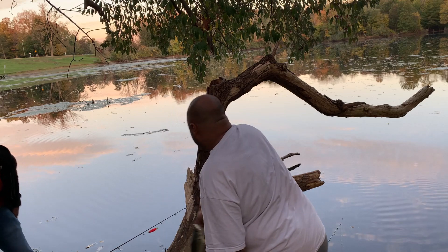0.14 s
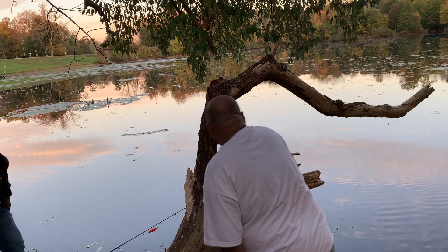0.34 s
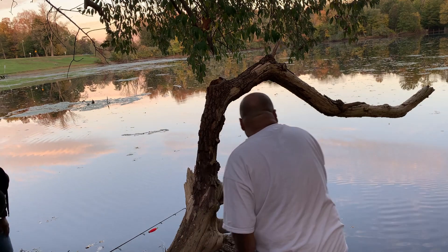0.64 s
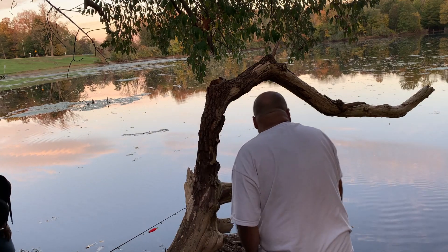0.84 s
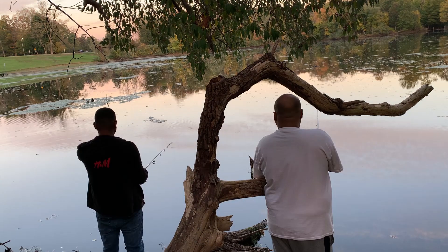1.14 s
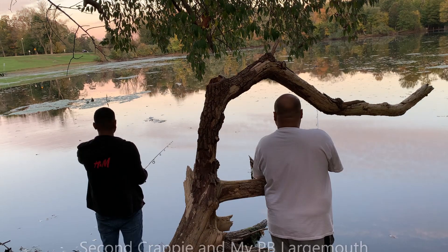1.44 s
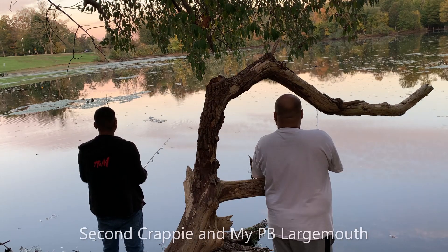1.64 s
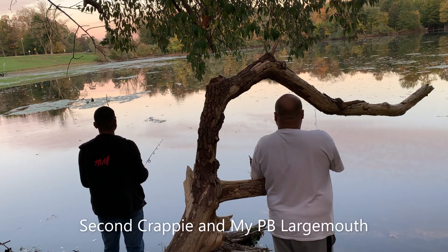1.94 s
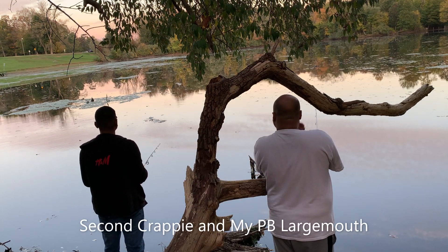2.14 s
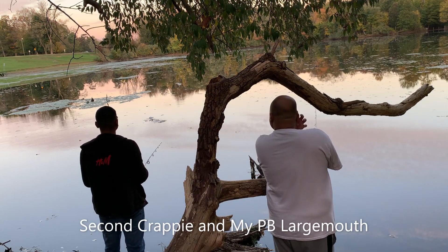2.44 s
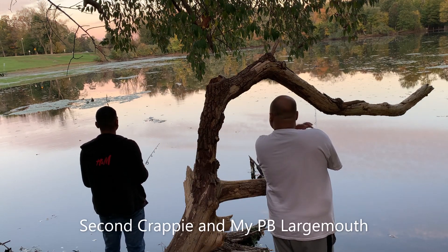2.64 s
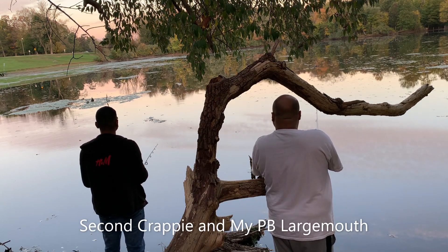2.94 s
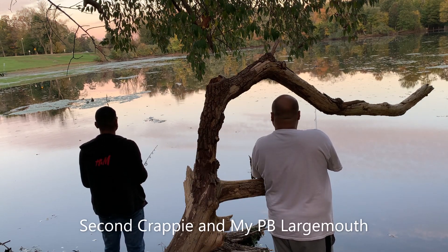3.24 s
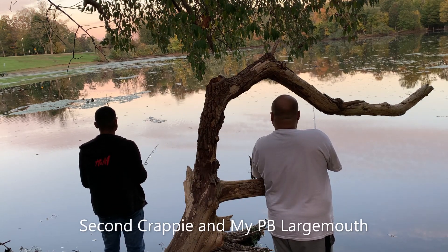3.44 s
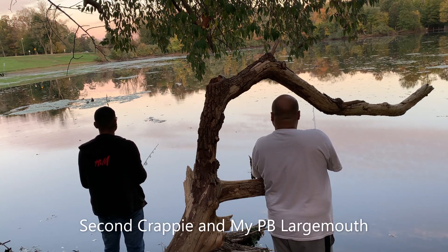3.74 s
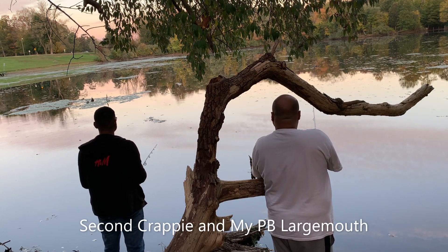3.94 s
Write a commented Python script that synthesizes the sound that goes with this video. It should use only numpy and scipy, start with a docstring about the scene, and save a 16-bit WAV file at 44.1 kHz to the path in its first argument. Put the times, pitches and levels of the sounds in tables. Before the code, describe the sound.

Crickets trill in overlapping bursts over a far insect chorus and low traffic rumble, with cloth rustles and small ticks early on.

```python
"""A pond at dusk: single crickets trill, often overlapping, before a far chorus, all scattered by the bank's trees.
Each wing stroke sounds as a short tone with harmonics; the furthest crickets are a band of noise.
Distant traffic rumbles underneath as filtered noise, with a faint hum, and a far car passes.
Clothes rustle and tick as bursts of noise, mostly in the first second.
Then the level dips briefly, and the road is a little louder from there on, over a faint hiss of air."""
import sys
import numpy as np
from scipy import signal
from scipy.fft import rfft, irfft, dct
from scipy.io import wavfile
from scipy.ndimage import uniform_filter1d

SR = 44100
rng = np.random.default_rng(int(sys.argv[2]) if len(sys.argv) > 2 else 0)


def to_wav(sig):
    """Store sig (one row per channel, or 1-D mono) as 16-bit WAV at the path in sys.argv[1].

    Samples outside -1..1 are clipped; the rate is SR.
    """
    pcm = np.clip(np.atleast_2d(sig), -1, 1) * 32767
    pcm = np.round(pcm).astype(np.int16)
    wavfile.write(sys.argv[1], SR, pcm.T)  # frames by channels


N = 180060
TIME = np.arange(N) / SR  # s

# Trills of single crickets; echo is relative to direct sound, third harmonic to the fundamental:
# start_s, end_s, pitch_hz, level_db, echo_db, third_harmonic_db, strokes_per_s, fade_in_s
CRICKET_TRILLS = [ (0.00, 0.223, 4540, -64.5, 4, -32, 37, .005), (0.00, 0.252, 4073, -66, 7, -32, 33, .005),
                  (0.00, 0.115, 4360, -64.5, 7, -32, 40, 0.0046),
                  (0.28, 0.64, 4450, -65, 2, -32, 30, 0.045), (0.30, 0.67, 4730, -76, 13, -35, 32, 0.046),
                  (0.619, 1.00, 4020, -75, 6, -32, 36, 0.026), (0.84, 1.006, 4510, -65, 5, -36, 33, 0.022),
                  (1.04, 1.25, 4335, -57.3, 6, -20, 35, .01),
                  (1.04, 1.213, 4570, -66.5, -1, -29, 37, 0.007),
                  (1.39, 1.80, 4010, -63.5, 3, -32, 35.3, .1), (1.50, 1.93, 4130, -66, 5, -21.5, 33, .02),
                  (1.601, 1.834, 4400, -66, -1, -20.5, 34.8, .015),
                  (1.45, 1.92, 3830, -72, 7, -35, 33, 0.09), (1.96, 2.20, 4140, -64.5, 2, -34, 35, .04),
                  (2.06, 2.40, 4410, -66, 3, -34, 35, .04),
                  (2.253, 2.676, 3908, -56.3, -9, -30.5, 34.95, .003),
                  (2.48, 2.72, 4250, -64, 3, -34, 36, .05), (2.634, 2.89, 4320, -58, 5, -28, 37, .03),
                  (2.86, 3.06, 4550, -63.5, 7, -32, 35, .015), (2.84, 3.12, 4230, -63.5, 5, -34, 37, .02),
                  (3.066, 3.42, 3950, -58, -2, -30, 36.3, .14), (3.01, 3.37, 3860, -66.5, 3, -32, 33, .04),
                  (3.35, 3.625, 4590, -70, 9, -32, 34, 0.055), (3.40, 3.62, 4120, -64.5, 4, -34, 35, .05),
                  (3.517, 3.857, 3780, -75, 7, -35, 30, 0.0091), (3.535, 3.827, 4325, -61, 8, -17, 35, .03),
                  (3.755, 4.08, 4235, -59, 3, -34, 36, .02), (3.99, 4.08, 3870, -67, 4, -34, 34, .015), ]
# Short cheeps, and one strong wing stroke within a trill: start_s, length_s, pitch_hz, level_db
CRICKET_CHEEPS = [ (0.193, 0.033, 3870, -66), (.80, 0.032, 3670, -72.5), (0.912, 0.025, 3680, -70),
                  (1.723, 0.019, 4010, -58), ]
# Nearer calls of the small insects: start_s, end_s, pitch_hz, level_db
SMALL_INSECT_CALLS = [(1.31, 1.56, 4990, -80.5), (1.93, 2.05, 8240, -79), (2.98, 3.29, 4990, -82.5),
                      (3.62, 3.88, 8480, -83.5)]
# Spectrum shape of the furthest crickets: frequency_hz, density_db_per_hz
HAZE_SPECTRUM = [(3000, -23), (3350, -24), (3650, -12.5), (3850, -13), (4100, 2.5), (4400, -0.5),
                 (4600, -8), (4800, -7.5), (5050, -10.5), (5300, -30), (6000, -62)]
# Brushes of cloth, one per movement; the treble tilt acts above 6 kHz:
# peak_s, rise_s, decay_s, level_db, treble_tilt_db_per_octave
CLOTH_BRUSHES = [(0.057, 0.042, 0.05, -56.5, -1.5), (.48, 0.053, 0.049, -70.5, -9),
                 (.57, 0.04, 0.096, -68.5, -11), (.66, .015, 0.038, -70, -5), (.91, 0.14, .1, -74, -15),
                 (1.60, 0.054, 0.09, -74.5, -10), (1.78, 0.1, 0.044, -74.5, -10)]
# Dry ticks: start_s, decay_s, level_db
CLOTH_TICKS = [(.208, 0.014, -67), (.283, 0.0022, -59), (.64, .004, -67), (.98, 0.04, -67.5)]
# Spectrum shape of rubbing cloth: frequency_hz, density_db_per_hz
CLOTH_SPECTRUM = [(1500, -3.5), (3000, -2.5), (6000, -1), (8500, 2.5), (11000, 2.5), (14000, 4),
                  (16000, -11)]
# Spectrum shape of the far engines: frequency_hz, density_db_per_hz
RUMBLE_SPECTRUM = [(20, -34.5), (30, -14), (40, -10.5), (50, -0.5), (78, 0.5), (105, -2), (135, -8.5),
                   (180, -13), (240, -18), (340, -24.5), (500, -33), (900, -65.5)]
# Spectrum shape of the far tyre roar: frequency_hz, density_db_per_hz
TYRE_SPECTRUM = [(150, -16), (350, -9.5), (500, -2), (730, 1), (1000, -2.5), (1300, -8.5), (1700, -11.5),
                 (2100, -17), (2700, -30.5), (3300, -30), (5000, -54)]
# Spectrum shape of the passing car's tyres: frequency_hz, density_db_per_hz
CAR_SPECTRUM = [(400, -13), (900, -4), (1600, 5), (2100, -1.5), (2600, -5), (3200, -24), (5000, -30)]
# Spectrum shape of the air hiss: frequency_hz, density_db_per_hz
AIR_SPECTRUM = [(2000, -6.5), (5500, -8.5), (7500, -2), (10000, -1.5), (12500, 0), (14000, -6),
                (15000, -12), (16000, -12)]
# Stereo width of the microphone pair: frequency_hz, difference_signal_gain_db
STEREO_WIDTH = [(2000, -0.5), (2800, 7), (3300, 2), (3800, 2.5), (4300, 2.5), (6000, 3), (10000, -3),
                (15000, -5)]
# Bass mismatch of the two microphones: frequency_hz, left_lead_rad, left_against_right_db
MICROPHONE_MISMATCH = [(29.8, .16, -1.5), (68.6, 0.27, -1.2), (130, 0.31, .5), (234, 0.24, .8),
                       (480, 0.35, -0.7), (650, -.4, 1.2), (1010, -0.7, 0.5), (1460, -0.01, -0.5)]

# wing strokes: sounding share of a cycle, share by which the pitch sags
STROKE_SHARE, STROKE_SAG = .56, .036
SECOND_UNDER_THIRD_DB = -6  # second harmonic against the third
# the second wing rings lower, weaker and later: pitch ratio, level (dB), lag (share of a cycle)
LOWER_WING_RATIO, LOWER_WING_DB, LOWER_WING_LAG = .941, -16, .33
LOWER_WING_SCATTER = 0.00894  # its pitch varies from stroke to stroke (share)
NEAR_LEFT_DB = 1.5
BANK_ECHO_S, BANK_ECHO_DB = .0125, -11
OVERTONE_ECHO_DB = 2  # echo against direct sound
CHORUS_DB, CHORUS_SWELL_DB, CHORUS_SWELLS_PER_S = -61.3, .3, 2.3
SMALL_INSECTS_DB, SMALL_STROKES_PER_S = -86, 34.8
ENGINES_DB, TYRES_DB, ROAD_BEFORE_DIP_DB = -44.5, -59, -3
CAR_NEAREST_S, CAR_DB, CAR_DISTANCE_M, CAR_SPEED_M_S = 2.88, -69.5, 19, 30
HUM_HZ, HUM_DB = 299.4, -72.5
DIP_S, DIP_HALF_S, DIP_DB = 1.017, 0.033, -33
TOP_HZ = 15650


def undb(db):
    """Logarithmic level: 20 dB is a factor of ten in amplitude."""
    return 10 ** (np.asarray(db) / 20)


def unit(x):
    """Normalisation: scale to rms 1."""
    return x / np.sqrt(np.mean(x ** 2) + 1e-20)


def colour(x, points):
    """Linear filtering: weight the cosine spectrum by a gain interpolated over log frequency."""
    hz, db = np.transpose(points)
    bins = np.maximum(np.arange(N) * SR / (2 * N), 1)
    gain = undb(np.interp(np.log(bins), np.log(hz), db))
    spectrum = dct(x, norm="ortho")
    return dct(spectrum * gain, type=3, norm="ortho")


def walk(rate):
    """Slow random modulation: smoothed random steps, rate per second, with rms 1."""
    step = int(SR / rate)
    steps = np.repeat(rng.standard_normal(N // step + 1), step)
    return unit(uniform_filter1d(steps, step)[:N])


def pan(x, left_db):
    """Interaural level difference: lean a sound to the left."""
    return x * undb(np.array([[left_db], [-left_db]]) / 2)


def stereo_noise(side_db):
    """Partial coherence: noise common to both ears plus a part that is opposite in them."""
    mid, side = rng.standard_normal((2, N))
    return unit(mid + undb(side_db) * side * np.array([[1], [-1]]))


def add(out, x, start):
    """Superposition: mix a short stereo sound in at a time in seconds."""
    i = int(start * SR)
    first, last = max(i, 0), min(i + x.shape[1], N)
    if last > first:
        out[:, first:last] += x[:, first - i:last - i]


def trees(x, echo_db, t60=0.1, delay_s=.004):
    """Diffuse scattering: trunks and leaves add a short tail, different at each ear, at about equal total energy."""
    t = TIME[:SR // 6]
    decay = undb(-60 * t / t60) * (t > delay_s)
    tail = rng.standard_normal((2, len(t))) * decay
    wet = signal.fftconvolve(x[None], tail, axes=1)
    wet *= np.sqrt(np.sum(x ** 2) / np.sum(wet ** 2, axis=1, keepdims=True))
    direct = np.pad(x, (0, len(t) - 1))
    return (direct + undb(echo_db) * wet) / np.hypot(1, undb(echo_db))


def trill(length, hz, rate, third_db=-40, second_db=-37, duty=.62, sag=.05, rise=.004, uneven_db=1.3,
          jitter=.003, soft_s=.015, wing_db=0):
    """Stridulation: each stroke drags scraper over file; its pitch sags late on, and the second wing rings late."""
    t = TIME[:int(max(length, 1 / 100) * SR)]
    cycles = t * rate
    # one random draw per stroke for pitch, strength and second wing
    pitch_chance, level_chance, wing_chance = rng.standard_normal((SR // 100, 3))[cycles.astype(int)].T
    stroke = np.minimum(cycles % 1 / min(duty, 1), 1)
    late_stroke = np.clip((cycles % 1 - LOWER_WING_LAG) / min(duty, 1), 0, 1)

    slowing = stroke ** 4 - .5 ** 4
    drift = rise * (t / t[-1] - .5)  # over the whole trill
    pitch = hz * (1 - sag * slowing + drift + jitter * pitch_chance)
    phase = 2 * np.pi * np.cumsum(pitch) / SR
    first_wing = np.sin(phase) + undb(second_db) * np.sin(2 * phase) + undb(third_db) * np.sin(3 * phase)

    lower_pitch = LOWER_WING_RATIO * hz * (1 + LOWER_WING_SCATTER * wing_chance)
    lower_phase = 2 * np.pi * np.cumsum(lower_pitch) / SR
    second_wing = undb(LOWER_WING_DB + wing_db) * np.sin(lower_phase)

    # a trill that swells in slowly also eases off slowly
    onset = 1 - .75 * np.exp(-t / soft_s)
    release = np.clip((t[-1] - t) / (.004 + .4 * soft_s), 0, 1)
    wings = first_wing * np.sin(np.pi * stroke) + second_wing * np.sin(np.pi * late_stroke)
    return unit(wings * undb(uneven_db * level_chance) * onset * release)


def near_crickets(jitter=.0022):
    """Discrete reflection and scattering: single crickets, often overlapping, each trill thrown back by the bank."""
    out = np.zeros((2, N))
    lag = int(BANK_ECHO_S * SR)
    below_overtones = signal.butter(4, 6000, fs=SR, output="sos")
    for start, end, hz, db, echo_db, third_db, rate, fade_s in CRICKET_TRILLS:
        call = trill(end - start, hz, rate, third_db, third_db + SECOND_UNDER_THIRD_DB,
                     duty=STROKE_SHARE, sag=STROKE_SAG, jitter=jitter, soft_s=fade_s)
        bank_echo = undb(BANK_ECHO_DB) * np.pad(call, (lag, 0))
        call = (np.pad(call, (0, lag)) + bank_echo) * undb(db)
        tone = signal.sosfiltfilt(below_overtones, call)
        # the overtones have one echo level for all trills
        overtones = trees(call - tone, OVERTONE_ECHO_DB)
        add(out, pan(trees(tone, echo_db), NEAR_LEFT_DB) + overtones, start)
    for start, length, hz, db in CRICKET_CHEEPS:
        cheep = trill(length, hz, .5 / length, rise=-0.012, wing_db=-11)
        add(out, pan(trees(cheep, -4), NEAR_LEFT_DB) * undb(db), start)
    return out


def chorus(centre_hz, spread_hz, overtone_db, echo_db, count, rate=35, length_s=.35):
    """Incoherent superposition: overlapping trills, each with its own pitch, tempo and strength."""
    out = np.zeros((2, N))
    # insects that call together spread over the whole pitch range
    groups = [rng.permutation(np.linspace(-1, 1, 8)) for _ in range(count // 8 + 1)]
    places = np.concatenate(groups)
    for slot, place in zip(np.linspace(-length_s, TIME[-1], count), places):
        detune, tempo, strength, late = rng.uniform(-1, 1, 4)
        place = (7 * place + detune) / 8
        hz = centre_hz + spread_hz * place
        call = trill(length_s, hz, rate * (1 + 0.1775 * tempo), overtone_db, overtone_db)
        swell = np.sqrt(np.hanning(len(call)))
        # voices at the edges of the pitch range are the weak ones
        voice_db = 2 * strength - 8 * place ** 2
        add(out, trees(call * swell, echo_db) * undb(voice_db), slot + .04 * late)
    return unit(out)


def far_insects(trills_db=-1.3, haze_db=-7.5, echo_db=1, flicker_db=1.5):
    """Many-source limit: crickets along the bank swell gently together; the furthest blur into noise."""
    trills = chorus(4230, 470, -31.5, echo_db, count=150) * undb(trills_db)
    haze = unit(colour(rng.standard_normal((2, N)), HAZE_SPECTRUM))
    haze = haze * undb(haze_db + flicker_db * walk(70))
    swell_db = CHORUS_SWELL_DB * walk(CHORUS_SWELLS_PER_S)
    return pan(trills + haze, 3.4) * undb(CHORUS_DB + swell_db)


def clothes(slip_db=1.7, surge_db=1.2, catch_db=1.4):
    """Stick-slip friction: each brush swells and dies away in tiny slips, the duller ones halting; sharper ticks."""
    out, tick_envelope = 0, 0
    slips = unit(undb(slip_db * walk(1500) + surge_db * walk(90)))
    for peak, rise, decay, db, tilt_db in CLOTH_BRUSHES:
        spectrum = [(hz, level + tilt_db * np.log2(max(hz / 6000, 1))) for hz, level in CLOTH_SPECTRUM]
        rub = unit(colour(stereo_noise(-2.2), spectrum))
        # the steeper the treble tilt, the deeper the catches
        catches = unit(undb(catch_db * tilt_db / 10 * np.tanh(2 * walk(130))))
        envelope = np.exp(-np.abs(TIME - peak) / np.where(TIME < peak, rise, decay))
        out = out + rub * slips * catches * undb(db) * envelope
    for start, decay, db in CLOTH_TICKS:
        fade = np.exp(-np.abs(TIME - start) / decay)
        tick_envelope = tick_envelope + undb(db) * (TIME >= start) * fade
    return out + unit(colour(stereo_noise(-2.2), CLOTH_SPECTRUM)) * tick_envelope


def passing_car():
    """Spherical spreading: tyre noise whose amplitude falls as one over the distance of a car driving by."""
    distance = np.hypot(CAR_DISTANCE_M, CAR_SPEED_M_S * (TIME - CAR_NEAREST_S))
    tyre_noise = unit(colour(stereo_noise(-1), CAR_SPECTRUM))
    return tyre_noise * undb(CAR_DB) * CAR_DISTANCE_M / distance


def traffic():
    """Coherence of far noise: engines rumble nearly alike in both ears, tyre roar is wider; a faint hum wavers."""
    rumble = unit(colour(stereo_noise(-22.5), RUMBLE_SPECTRUM)) * undb(ENGINES_DB + 1.2 * walk(6.41))
    tyres = unit(colour(stereo_noise(-4.5), TYRE_SPECTRUM)) * undb(TYRES_DB + 0.89 * walk(9.9))
    road = (tyres + passing_car()) * undb(ROAD_BEFORE_DIP_DB * (TIME < DIP_S))
    hum_pitch = HUM_HZ * (1 + 0.01114 * walk(10))
    hum_phase = 2 * np.pi * np.cumsum(hum_pitch) / SR
    hum = np.sin(hum_phase) * undb(HUM_DB + 4.6 * walk(2.86))
    return pan(rumble, -0.67) + pan(road, 0.36) + hum


def small_insects():
    """Stridulation at higher pitch: a chorus about an octave above the crickets; now and then a nearer call."""
    out = chorus(8450, 750, -90, 3, count=140) * undb(SMALL_INSECTS_DB)
    for start, end, hz, db in SMALL_INSECT_CALLS:
        call = trill(end - start, hz, SMALL_STROKES_PER_S, sag=0.004, jitter=.002, soft_s=.05)
        add(out, trees(call, 10) * undb(db), start)
    return pan(out, 8.1)


def air_hiss():
    """Stationary broadband noise: a faint, steady hiss, nearly alike in both ears."""
    hiss = unit(colour(stereo_noise(-18), AIR_SPECTRUM)) * undb(-84.0)
    return pan(hiss, 0.43)


def microphones(x):
    """Transducer mismatch: the pair differs a little in phase and level, chiefly at low frequencies."""
    hz, lead, left_db = np.transpose(MICROPHONE_MISMATCH)
    bins = np.log(np.maximum(np.arange(N // 2 + 1) * SR / N, 1))
    phase = np.interp(bins, np.log(hz), lead)
    level_db = np.interp(bins, np.log(hz), left_db)
    # each side takes half of the difference
    half = np.exp(1j * phase / 2) * undb(level_db / 2)
    return irfft(rfft(x) * np.array([half, 1 / half]), N)


def scene():
    """Superposition of insects, clothes, traffic and air."""
    insects = near_crickets() + far_insects() + small_insects()
    return insects + clothes() + traffic() + air_hiss()


def record(dry):
    """Mid-side stereo: the image is widened most near 3 kHz; the level dips briefly, and the top is cut."""
    side = (dry[0] - dry[1]) / 2
    extra_side = colour(side, STEREO_WIDTH) - side
    dry = microphones(dry + extra_side * np.array([[1], [-1]]))
    away_from_dip = np.clip(np.abs(TIME - DIP_S) / DIP_HALF_S, 0, 1) ** 2
    gain = away_from_dip + (1 - away_from_dip) * undb(DIP_DB)
    top_cut = signal.ellip(10, .2, 70, TOP_HZ, fs=SR, output="sos")
    return signal.sosfilt(top_cut, dry * gain)


dry = scene()
out = record(dry)
to_wav(out)
```